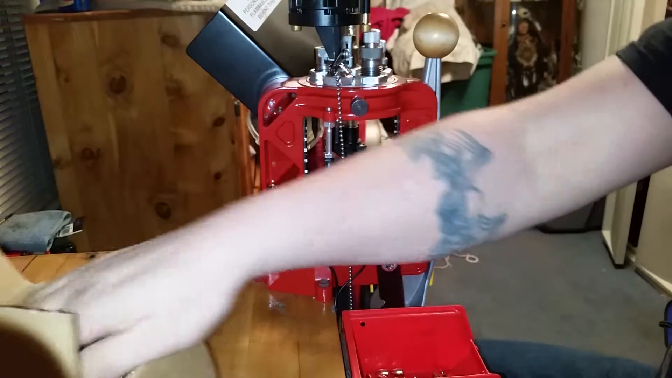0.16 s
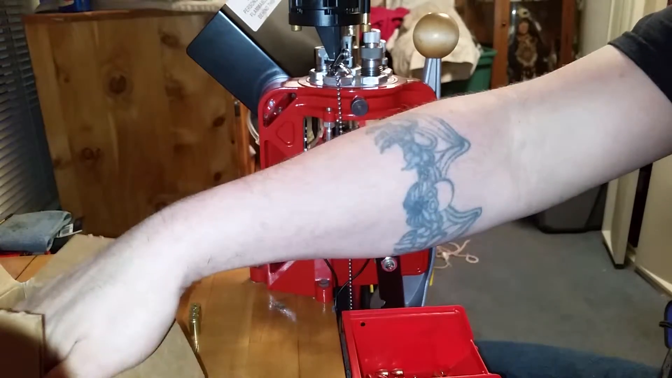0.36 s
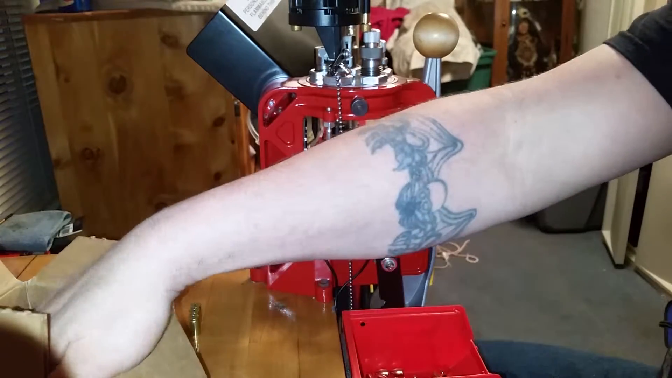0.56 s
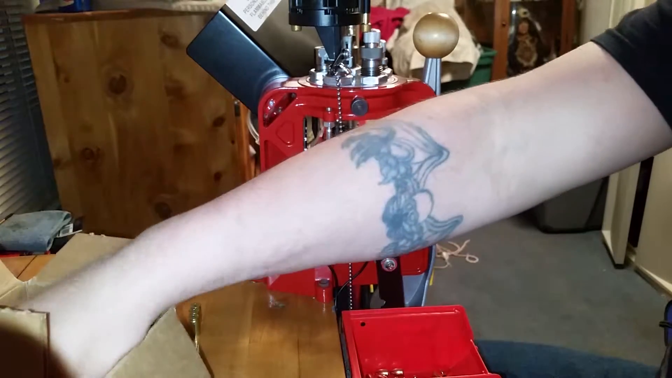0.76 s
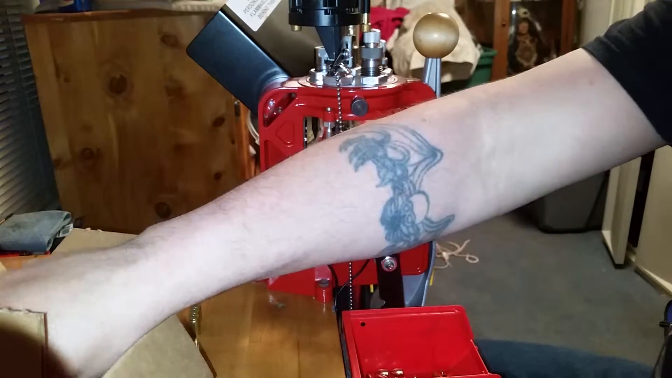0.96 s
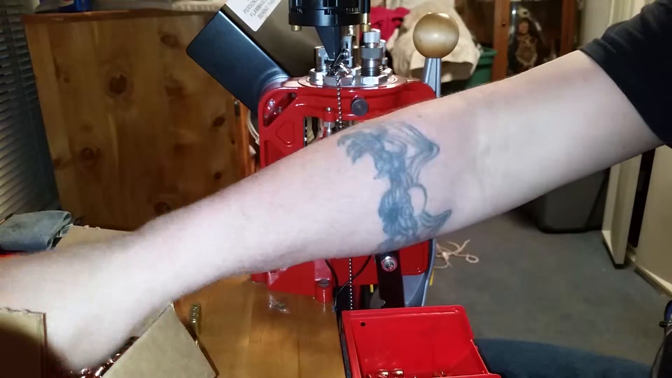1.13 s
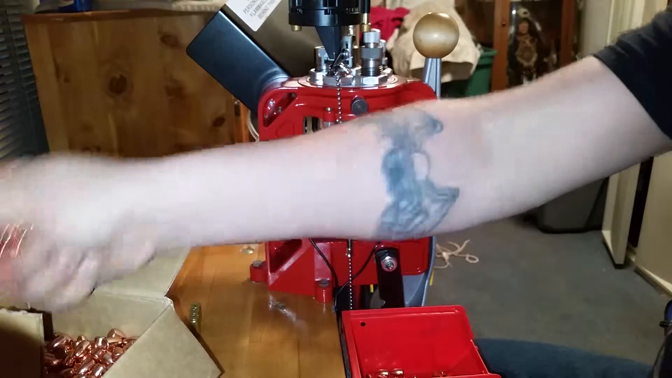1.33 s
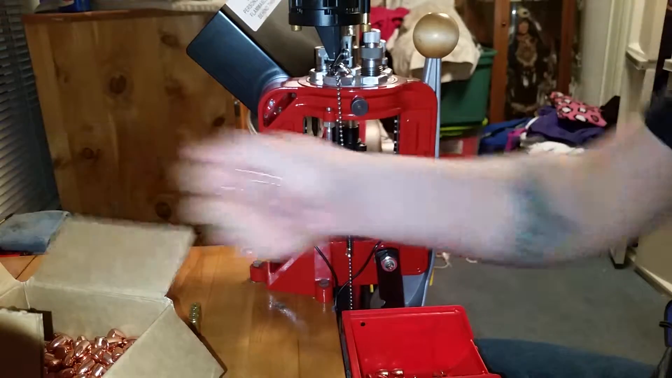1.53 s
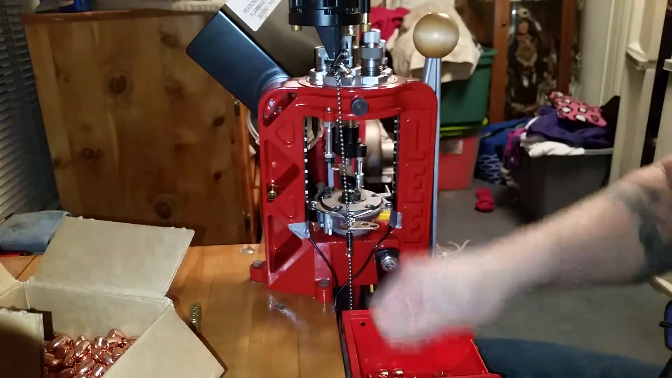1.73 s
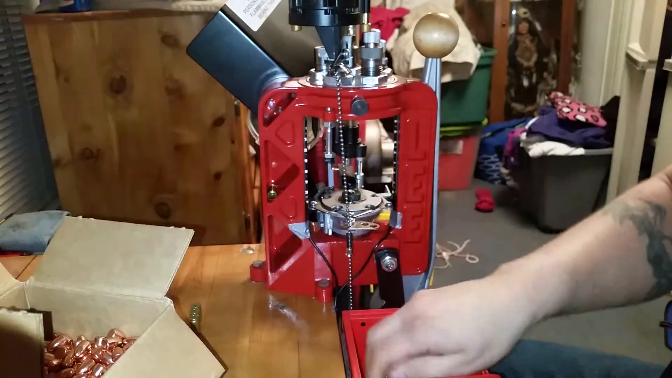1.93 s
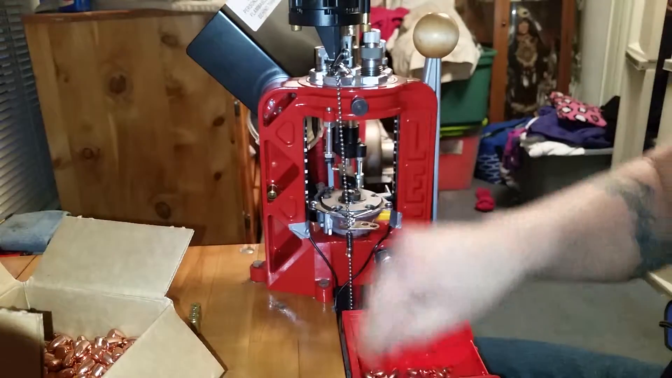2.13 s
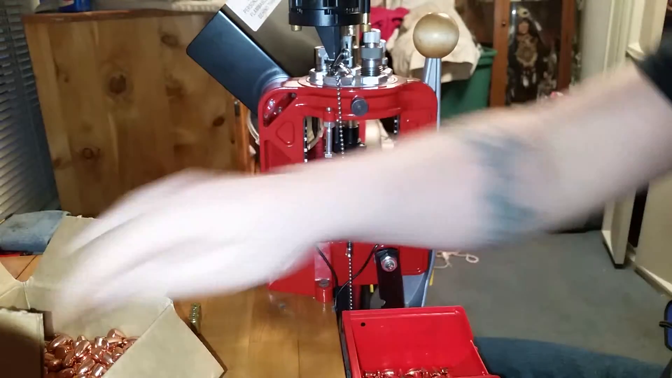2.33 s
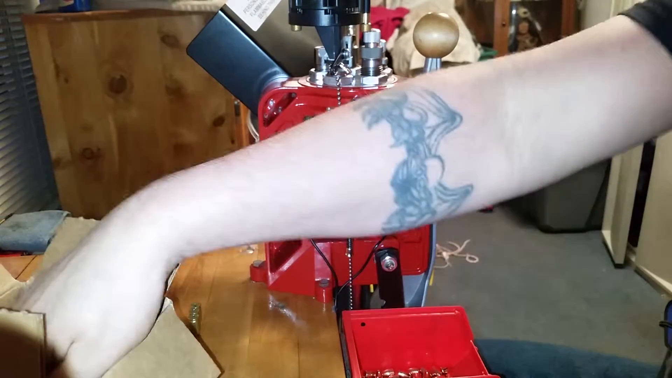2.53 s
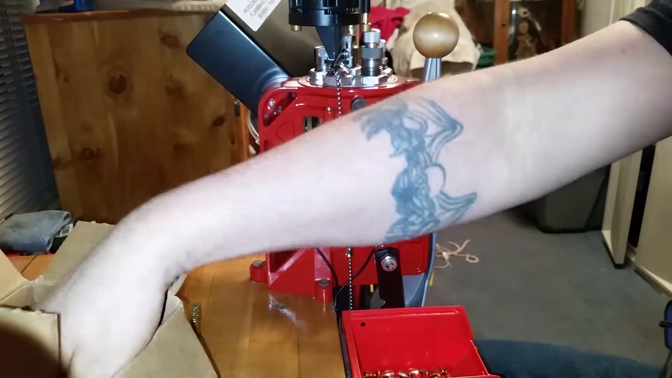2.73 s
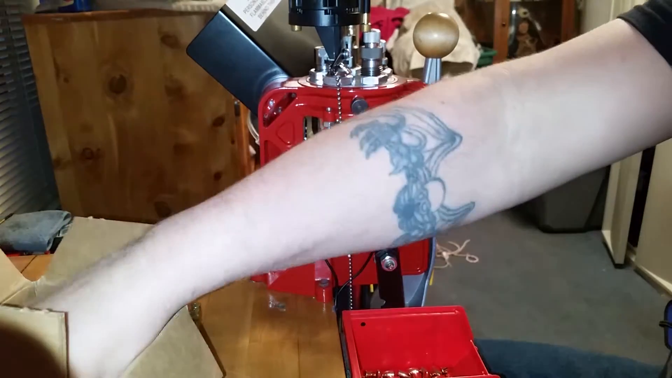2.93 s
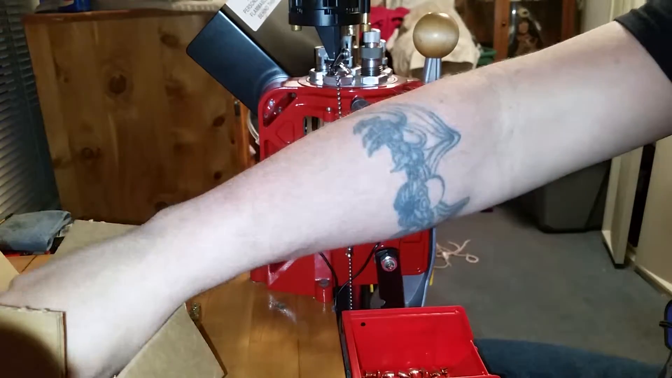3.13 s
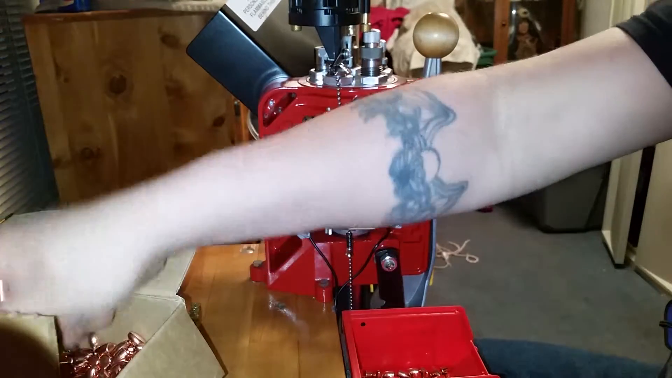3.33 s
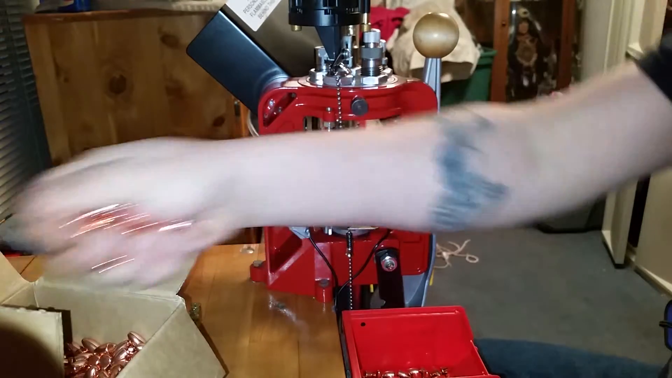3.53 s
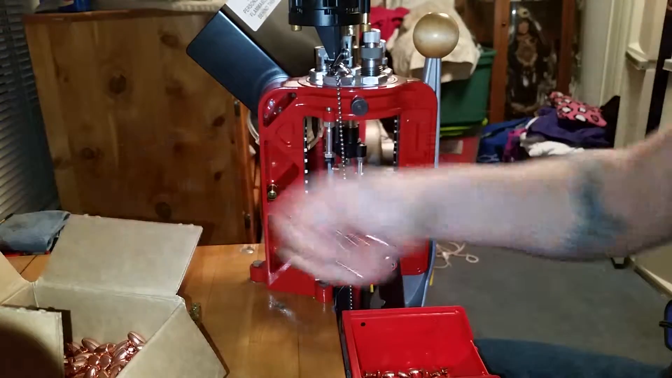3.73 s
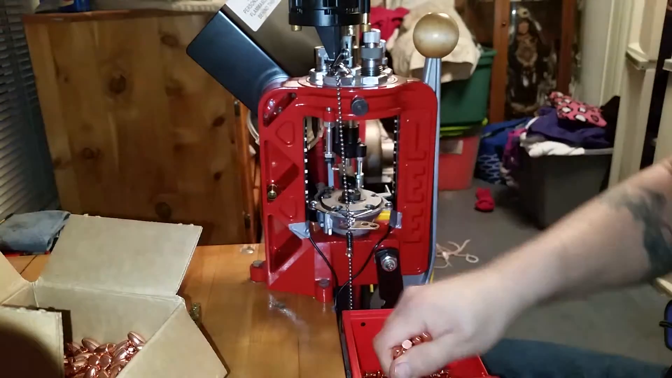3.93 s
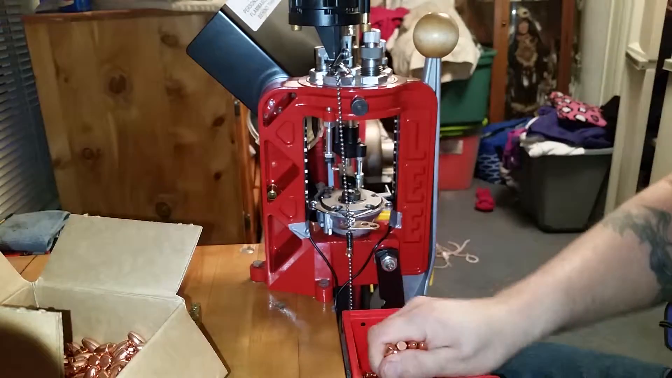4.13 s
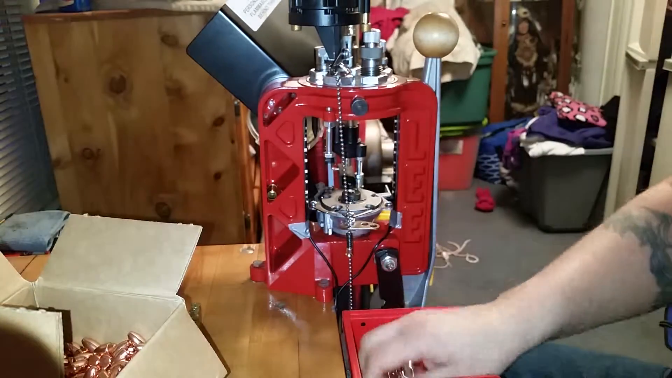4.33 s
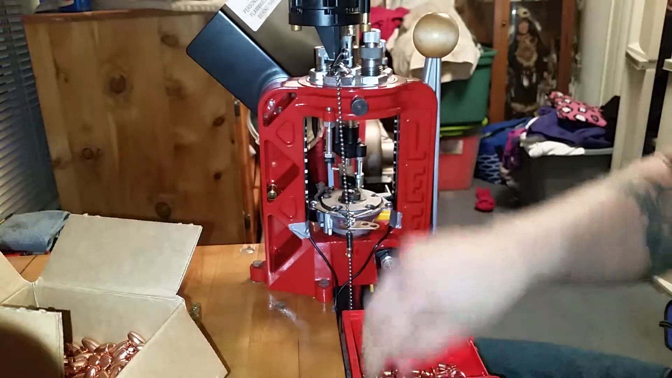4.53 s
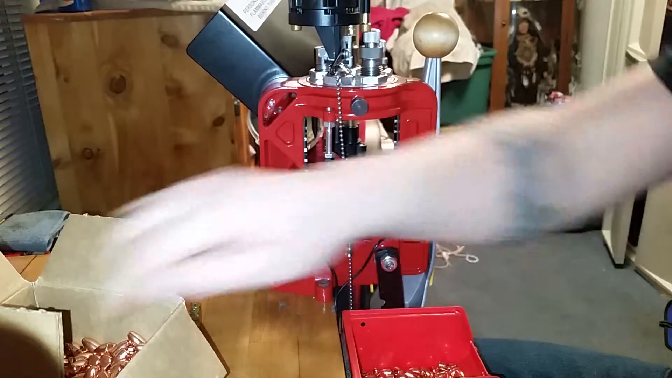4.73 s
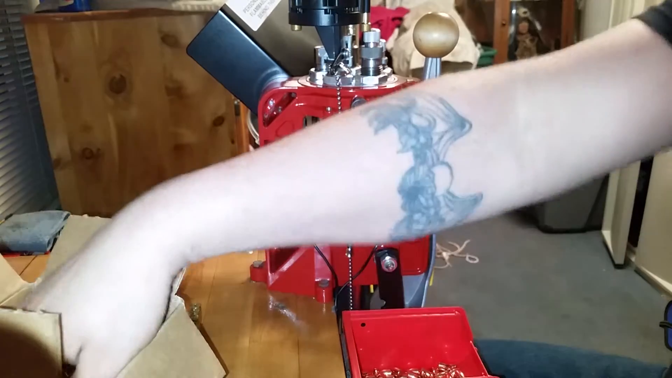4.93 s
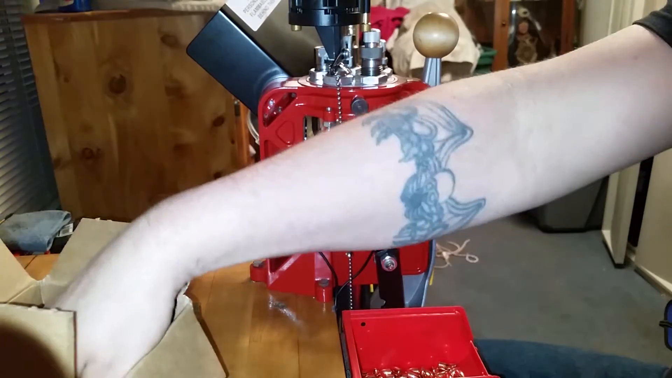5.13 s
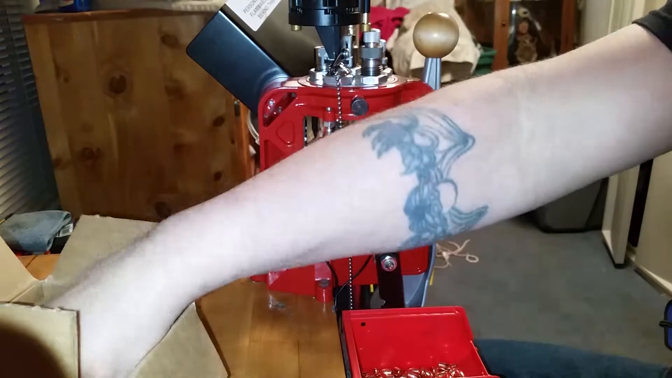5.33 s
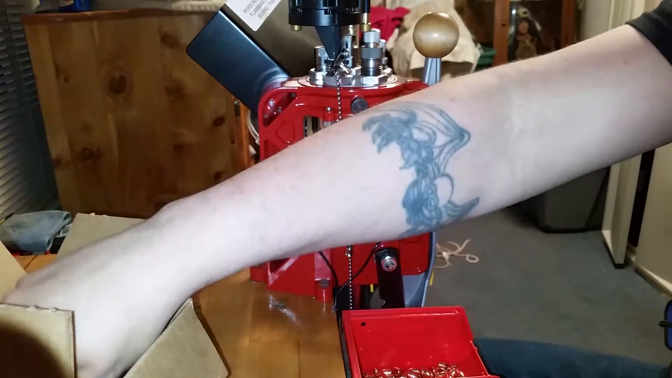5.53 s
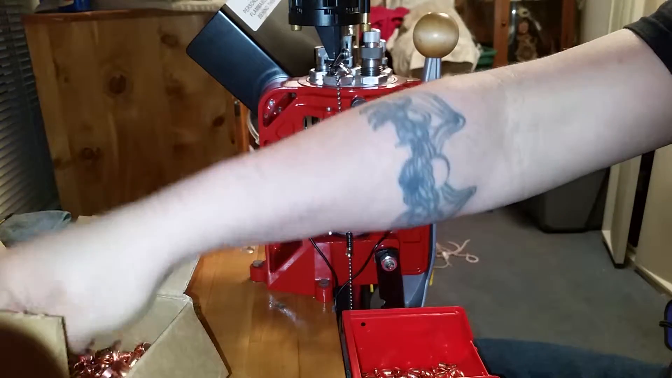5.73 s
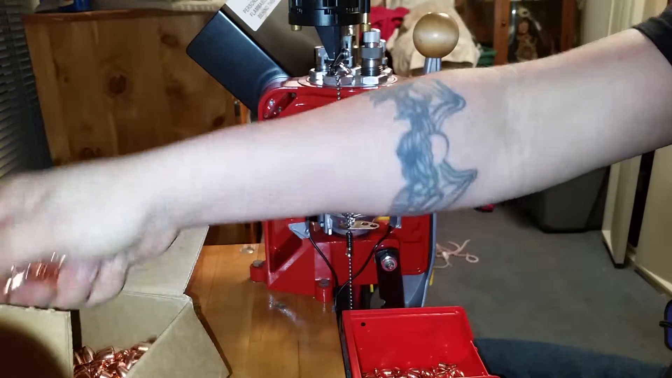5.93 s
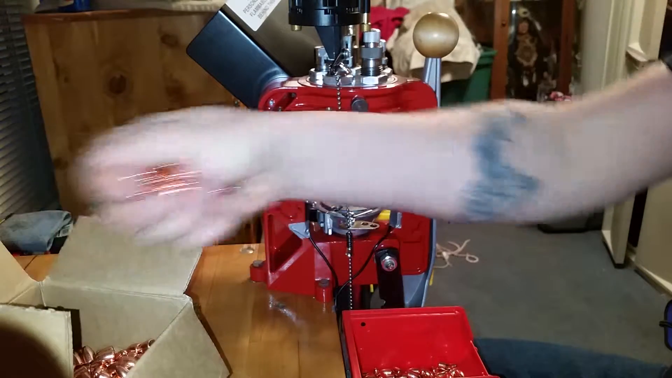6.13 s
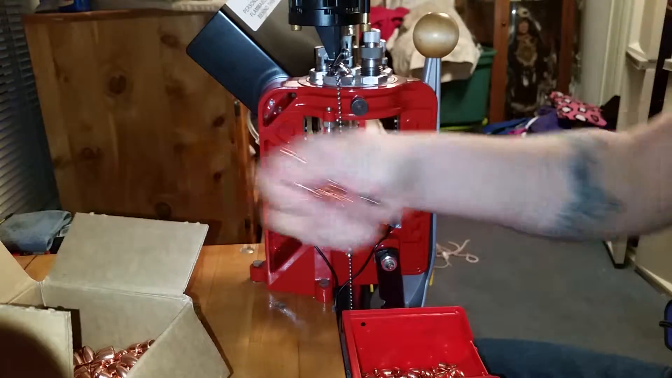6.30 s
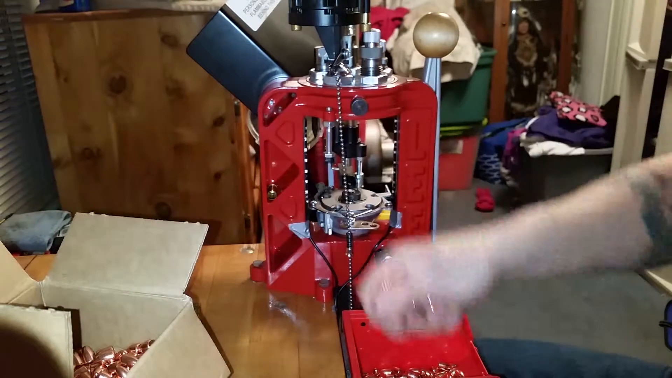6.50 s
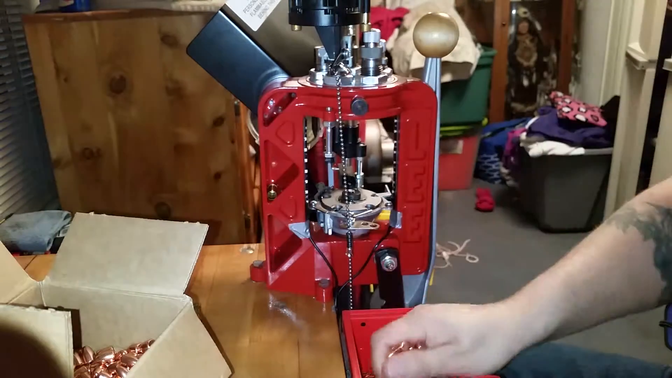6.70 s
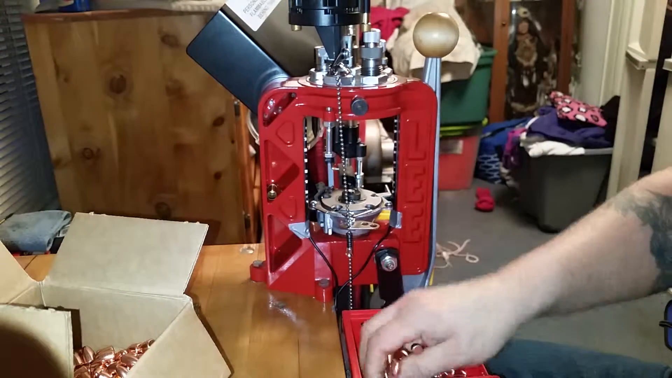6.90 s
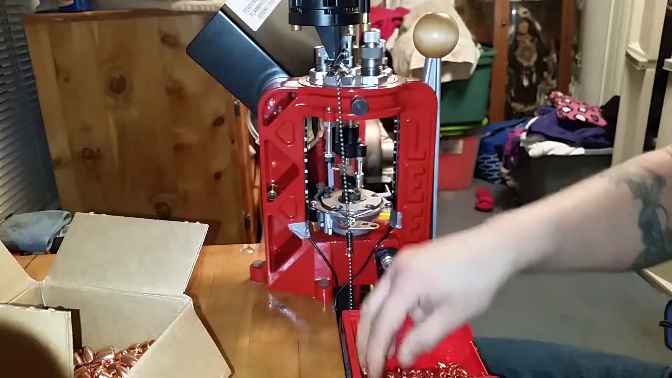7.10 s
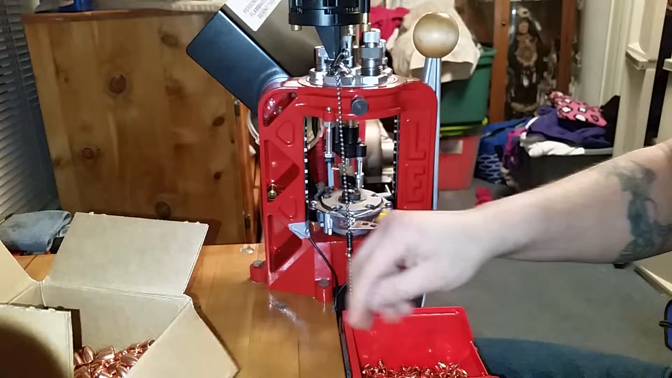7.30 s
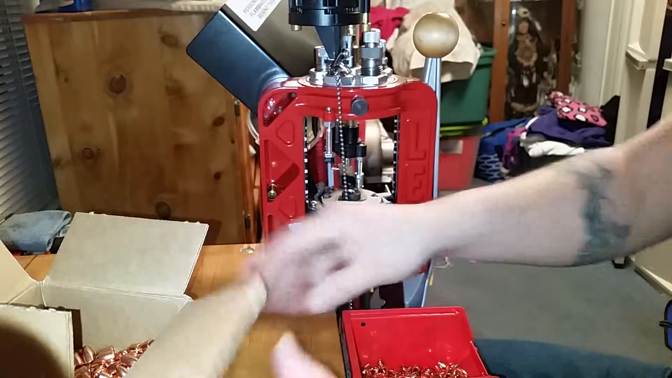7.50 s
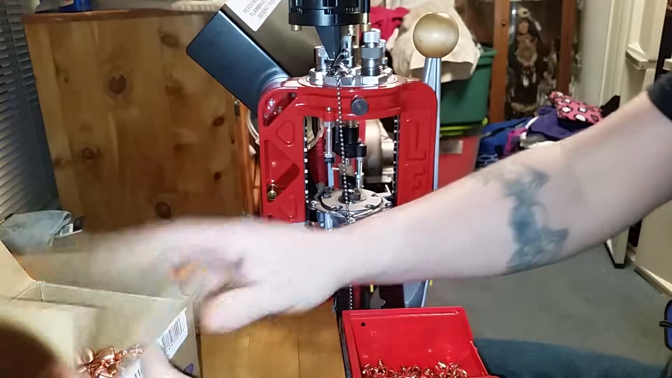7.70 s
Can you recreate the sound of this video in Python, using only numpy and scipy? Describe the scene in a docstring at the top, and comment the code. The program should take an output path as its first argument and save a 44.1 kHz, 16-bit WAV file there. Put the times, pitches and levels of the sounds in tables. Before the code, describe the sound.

A hand rakes through small metal bullets in a cardboard box, then pours clattering handfuls into a plastic tray, three times over, in a small room.

```python
"""A sleeve rustles over a low drone and faint hiss; a hand digs into a cardboard box of small copper bullets.
It carries a fistful across a bench and pours it into a plastic tray, three times; at the end the hand
shifts the box, which knocks and rattles briefly. Two microphone ports hear it all in a small room.
Random trains of contacts and timed knocks excite metal clicks and the ringing modes of box or tray.
The sleeve is dense grains of coloured noise; drone, hiss, air and bench shudder are filtered noise."""
import sys
import numpy as np
from scipy import signal
from scipy.fft import rfft, irfft, next_fast_len
from scipy.io import wavfile
from scipy.ndimage import uniform_filter1d

SR = 44100
rng = np.random.default_rng(int(sys.argv[2]) if len(sys.argv) > 2 else 0)


def inscribe(sig):
    """Save sig as 16-bit PCM at rate SR to the path in sys.argv[1].

    A 1-D sig is mono; a 2-D sig holds one channel per row.
    Samples are clipped to [-1, 1] before scaling.
    """
    pcm = np.round(np.clip(np.atleast_2d(sig).T, -1, 1) * 32767)
    wavfile.write(sys.argv[1], SR, pcm.astype(np.int16))


def ratio(d):
    """dB to gain"""
    e = np.asarray(d, float) / 20
    return 10 ** e


N = 346520
PLACES = 8  # spots struck, each with its own answer
TAPS = 16384  # length of an answer

# room air colour: hz, density_db
ROOM_AIR = [(25, -17.5), (63, -15), (100, -1.5), (190, -12.5), (360, -12.5), (450, -22.5), (1000, -30),
            (2500, -36.5), (6000, -48), (16000, -47.5)]
# low drones: centre_hz, width_hz, level_db
DRONES = [(69, 5.7, -56), (142, 14, -51)]
AIR_DB, HISS_HZ, HISS_DB = -53.5, 4220, -54.5
ROOM_T60_S, ROOM_DB = 0.21, -8.5

# jolts of the bench: time_s, peak_gain_db
JOLTS = [(0.04, -44), (0.2, -45), (0.701, -50), (2.21, -46), (3.46, -50), (3.74, -52), (4.07, -44.5),
         (4.421, -47.5), (4.66, -49.5), (4.97, -42.5), (5.49, -44.5), (6.91, -49.5), (7.399, -42),
         (7.7, -45), (7.84, -40.5)]
JOLT_RISE_DB_PER_S, JOLT_FALL_DB_PER_S = 110.5, 83
REST_DB, LEAN_DB = -59.5, -24  # shudder at rest; shudder against the hand's effort

# arm swinging by: start_s, stop_s, full_gain_db, stop_gain_db
ARM_SWINGS = [(-0.05, 0.294, -29, -35.5), (1.49, 1.616, -37.5, -38), (3.562, 3.737, -42.5, -32.5),
              (6.119, 6.275, -48.5, -35)]
SWING_RISE_S, SWING_RISE_DB, SWING_FALL_DB_PER_S = 0.035, 31, 597
# cloth colour: hz, density_db
CLOTH_COLOUR = [(300, -1), (1000, -6), (3000, -5), (6000, -2), (9000, -2), (16000, -9.5)]

# hand's effort, one list per stretch: three digs raking the heap, then shifting the box: time_s, clicks_gain_db
HAND_EFFORT = [
    [(0.2, -46.5), (0.32, -33), (0.45, -33), (0.512, -21.5), (0.6, -22), (0.63, -28.5), (0.76, -24.5),
     (1.0, -30.5), (1.2, -37.5), (1.36, -45.5), (1.46, -65.5)],
    [(2.49, -58.5), (2.56, -34), (2.652, -37.5), (2.732, -28), (2.836, -32.5), (2.942, -27.5), (3.03, -31),
     (3.27, -34.5), (3.482, -44.5), (3.558, -64)],
    [(4.92, -64), (4.948, -30.5), (5.034, -35.5), (5.14, -24.5), (5.414, -24.5), (5.48, -26.5),
     (5.582, -26.5), (5.87, -40.5), (5.99, -51.5), (6.14, -61.5)],
    [(7.48, -57.5), (7.682, -62), (7.702, -43.5), (7.8, -65), (7.806, -43.5), (7.858, -44.5)],
]
# dull bumps on the cardboard: time_s, peak_db
THUMPS = [(0.266, -28), (0.425, -24.5), (0.519, -23), (0.6, -19.5), (0.895, -24), (1.008, -24),
          (2.525, -31.5), (2.564, -22.5), (3.221, -27), (3.265, -26), (3.487, -38), (4.944, -24.5),
          (5.446, -12.5), (5.786, -26.5), (5.975, -31), (7.699, -41.5), (7.81, -30.5)]
# boom modes of the box walls: hz, energy_db, t60_s
WALL_MODES = [(252, -12, 0.021), (287, -6, 0.042), (334.4, 0.5, 0.099)]
BOOM_DB, BOOM_WANDER_DB = -10.5, 3.5

# single knocks in the box, and dull bumps of wrist or full fist as the arm stops:
# time_s, click_peak_db, body_vs_click_db
BOX_KNOCKS = [(0.2589, -30, 5), (0.3277, -17, -16), (0.482, -12, -5), (0.5744, -10, -16),
              (0.7794, -16.5, 2), (1.2494, -39, 0), (1.3405, -33, -25), (1.61, -46, 13), (2.5223, -24, -1),
              (3.486, -22.5, -4), (3.5208, -31.5, -9), (3.725, -44, 13), (4.9407, -27, 2),
              (5.1111, -17, 0.5), (5.559, -20, 7.5), (5.5994, -23, 14.5), (5.7828, -16.5, 2.5),
              (5.8593, -21, 0), (5.8994, -30, 4), (5.954, -25.5, -1), (5.9633, -23.5, -11),
              (6.0594, -48, 0), (6.0752, -27.5, -1), (6.098, -29.5, -5), (6.1332, -33, -4),
              (6.1722, -25.5, 0), (6.353, -33, -4.5), (7.5242, -32, -3), (7.5435, -27, -22),
              (7.5744, -32, -4), (7.628, -37.5, -7), (7.702, -31, 4), (7.7572, -28.5, 0), (7.7857, -39, -2),
              (7.8077, -27, -20)]
# rattle modes of the box: hz, energy_db, t60_s
BOX_MODES = [(572.4, -4, 0.07), (644, 5.5, 0.02), (833, -4, 0.058), (982, -2.5, 0.026), (1132, -0.5, 0.023),
             (1282, 4.5, 0.022), (1378, 1.5, 0.022), (1548, 1.5, 0.035), (1760, -0.5, 0.025),
             (1925, -7, 0.073), (2228, -7, 0.075)]
# metal click colour in the box: hz, density_db
BOX_CLICK_COLOUR = [(300, -19.5), (1000, -2.5), (2000, -0.5), (4000, -1.5), (8500, -6), (11000, -11),
                    (13500, -18.5), (16000, -22.5)]
# rattle against clicks: grows as the fist closes, drops once it lifts clear
RATTLE_DB, CLOSING_DB_PER_S, RATTLE_WANDER_DB = -5, 7, 1.53
LIFT_AFTER_S, LIFTED_DB_PER_S = 0.89, 29

# handfuls running out: fist_opens_s, full_flow_s, empty_s, full_gain_db, end_gain_db
POURS = [(2.038, 2.07, 2.382, -16.5, -25.5), (4.314, 4.36, 4.59, -15.5, -15.5),
         (6.818, 6.956, 7.254, -13.5, -21)]
POUR_RISE_DB, RUN_OUT_DB_PER_S = 14.5, 168
# hand touching the tray, and bullets slipping from the fist and skittering:
# time_s, clicks_gain_db, fall_db_per_s, tray_vs_clicks_db
TOUCHES_AND_SLIPS = [(1.92, -34.5, 898.5, 7), (1.962, -22, 302.5, 4), (2.023, -32, 203, -3),
                     (2.41, -34, 154, -12), (4.026, -49, 112, 5), (4.04, -23, 336, -2.5),
                     (4.228, -23, 703, 2), (4.26, -30.5, 37, -7.5), (4.317, -28.5, 602, 8.5),
                     (4.79, -79, 80, -25), (6.76, -54, 30, -12.5), (7.423, -52, 300, -5),
                     (7.47, -57, 100, -12)]
TOUCH_RISE_S = 0.012
# single knocks in the tray: time_s, click_peak_db, body_vs_click_db
TRAY_KNOCKS = [(1.9195, -30, 2.5), (1.9585, -13.5, -0.5), (1.9664, -6.5, -6), (1.9764, -18, 4),
               (1.9844, -22, -1), (1.9994, -30, -10), (2.0232, -3, -2), (2.0476, -6, -8), (2.0544, -9, -6),
               (2.1044, -15, 10), (2.3331, -11, -6), (2.4084, -8.5, -22), (2.4269, -18.5, -20),
               (2.4568, -16, -20), (4.0395, -24, 4), (4.1819, -14.5, 6.5), (4.1976, -30.5, -21),
               (4.2233, -6.5, 1.5), (4.2498, -16.5, -7), (4.2867, -17, -15), (4.3024, -15, 3),
               (4.3156, -11.5, -4), (4.335, -10.5, -6), (4.5007, -12.5, 3), (4.7222, -16, -18),
               (4.7834, -30, -22), (4.817, -28, -21), (4.8524, -40, -18), (6.7967, -33.5, -21),
               (6.8142, -22, 5), (6.8319, -21, 1), (6.8442, -11, -2.5), (6.8744, -11.5, 1.5),
               (6.8894, -11, 0), (6.9744, -9, -19), (7.1694, -12, -6), (7.2444, -12.5, -8.5),
               (7.419, -24, -13), (7.4694, -32.5, -9)]
# ringing modes of the tray: hz, energy_db, t60_s
TRAY_MODES = [(302, -12, 0.066), (523, -9, 0.2), (645, -5.5, 0.05), (698, -9.5, 0.13), (741.7, 0, 0.037),
              (791.5, -8, 0.12), (851, 4, 0.038), (921, -5.5, 0.21), (1273, -7.5, 0.022),
              (1754, -11.5, 0.032), (2730, -19.5, 0.04)]
# metal click colour in the tray: hz, density_db
TRAY_CLICK_COLOUR = [(300, -34), (1000, 0.5), (2000, 1), (4500, 1.5), (8500, -3), (11000, -11.5),
                     (13500, -14.5), (16000, -21.5)]
# tray ring against clicks: drops as bullets cover the floor, and with each handful already there
BARE_DB, COVER_DB_PER_S, COVERED_DB, HANDFUL_DB = 3, 33, -3, -3

# left port response added to the left channel: hz, gain_db
LEFT_PORT = [(1000, -1.5), (2200, -3.5), (4000, -12.5), (6500, -19), (8300, -4.5), (10000, 6), (12000, 4.5),
             (16000, 2.5)]


def conv(x, h):
    """Convolution along time, cut to the length of x."""
    size = next_fast_len(x.shape[-1] + h.shape[-1])
    return irfft(rfft(x, size) * rfft(h, size), size)[..., :x.shape[-1]]


def shape(x, points):
    """Colours x by (Hz, dB) points with a causal minimum-phase response."""
    size = 2048
    hz, db = np.transpose(points)
    bin_hz = np.arange(size // 2 + 1) * SR / size
    log_gain = np.interp(np.log(bin_hz + 1), np.log(hz), db) * np.log(10) / 20
    cepstrum = irfft(log_gain)
    cepstrum[1:size // 2] *= 2
    cepstrum[size // 2 + 1:] = 0
    return conv(x, irfft(np.exp(rfft(cepstrum))))


def unit(x):
    """Scales to energy 1, averaged over channels."""
    return x / np.sqrt(np.sum(x ** 2) / len(np.atleast_2d(x)))


def walk(rate_hz):
    """Random levels held 1 / rate_hz s and slewed twice; spread 1."""
    k = int(SR / rate_hz)
    held = np.repeat(rng.standard_normal(N // k + 1), k)
    steps = uniform_filter1d(uniform_filter1d(held, k), k)[:N]
    return steps / steps.std()


def pair(size, alike_hz):
    """Two noises, the same in the bass and unrelated in the treble."""
    low = signal.butter(2, alike_hz, fs=SR, output="sos")
    high = signal.butter(2, alike_hz, "high", fs=SR, output="sos")
    noise = rng.standard_normal((3, size))
    return signal.sosfilt(low, noise[0]) + signal.sosfilt(high, noise[1:])


def band(x, hz, width_hz):
    """Band-passes noise and scales it to rms 1."""
    edges_hz = [hz - width_hz / 2, hz + width_hz / 2]
    sos = signal.butter(2, edges_hz, "band", fs=SR, output="sos")
    return np.sqrt(N) * unit(signal.sosfilt(sos, x))


def fade(t60_s):
    """Exponential decay."""
    return np.exp(-np.log(1000) * np.arange(TAPS) / SR / t60_s)


def swell(start, full, stop, full_db, stop_db, rise_db, fall_db_per_s):
    """Gain that climbs rise_db from start to full, drifts on to stop and then dies away."""
    t = np.arange(N) / SR
    db = np.interp(t, [start, full, stop], [full_db - rise_db, full_db, stop_db])
    db = db - fall_db_per_s * np.maximum(t - stop, 0)
    return (t >= start) * ratio(db)


def since(starts):
    """Seconds since the latest of the given moments, 0 before the first."""
    t, starts = np.arange(N) / SR, np.array(starts)
    latest = np.maximum(np.searchsorted(starts, t) - 1, 0)
    return np.maximum(t - starts[latest], 0)


def room(direct):
    """Adds the walls' diffuse answer, which swells in over 0.8 ms and loses treble."""
    onset = np.minimum(np.arange(TAPS) / SR / 0.0008, 1)
    tail = unit(pair(TAPS, 750) * fade(ROOM_T60_S) * onset)
    return direct + ratio(ROOM_DB) * conv(shape(tail, [(2000, 2.0), (16000, -7)]), direct)


def click(colour, t60_s, left_db):
    """One contact: a sharp tick smeared by the neighbours it jostles."""
    decay = 0.57 * fade(0.0078) + fade(t60_s)
    sound = unit(shape(pair(TAPS, 640) * decay, colour))
    return room(sound * ratio([[left_db], [0]]))


def ring(modes, spread_rad_per_khz, low_hz):
    """A blow at one spot: modes start together with random shares; port phases part in the treble."""
    t, out = np.arange(TAPS) / SR, 0
    for hz, db, t60_s in modes:
        share, detune, phase = rng.standard_normal(3)
        lead_rad = np.array([[phase * spread_rad_per_khz * hz / 1000], [0]])
        wave = np.sin(2 * np.pi * hz * (1 + 0.013 * detune) * t + lead_rad)
        out = out + ratio(db + 2 * share) / np.sqrt(t60_s) * wave * fade(t60_s)
    swing_up = 1 - np.exp(-t / 0.003)
    bullet_damping = 0.54 + np.exp(-t / 0.008)  # early loss while the bullet still lies on the wall
    # the ring is cut away below low_hz
    high = signal.butter(3, low_hz, "high", fs=SR, output="sos")
    return room(unit(signal.sosfilt(high, out * swing_up * bullet_damping)))


def contacts(rate_hz, scatter_db, patchy_db):
    """Random contacts of unequal but bounded size, in clumps, dealt over the spots; mean power 1."""
    hit = rng.random((PLACES, N)) < rate_hz / PLACES / SR
    size = np.minimum(rng.exponential(size=hit.shape), 3)
    sign = rng.choice([-1, 1], hit.shape)
    train = hit * ratio(scatter_db * size + patchy_db * walk(70)) * sign
    return train / np.sqrt(np.mean(train.sum(0) ** 2))


def strike(stream, times_s, peak_db, answers):
    """Each spot answers its share of the stream and of single blows, which reach the given peaks."""
    force, size = stream.copy(), next_fast_len(N + TAPS)
    for k, (s, db) in enumerate(zip(times_s, peak_db)):
        spot = k % PLACES
        force[spot, int(s * SR)] += ratio(db) / np.abs(answers[spot].mean(0)).max()
    spectrum = sum(rfft(f, size) * rfft(a, size) for f, a in zip(force, answers))
    return irfft(spectrum, size)[:, :N]


def hand_effort_db():
    """Hand's effort over time, -120 dB between stretches."""
    t, out = np.arange(N) / SR, np.full(N, -120.)
    for rows in HAND_EFFORT:
        time_s, db = np.transpose(rows)
        inside = (t >= time_s[0]) & (t <= time_s[-1])
        out[inside] = np.interp(t[inside], time_s, db)
    return out


def shaking_db():
    """Bench shudder level: rest, the hand's effort and jolts that rise and fall linearly in dB."""
    t = np.arange(N) / SR
    level = ratio(REST_DB) + ratio(LEAN_DB + hand_effort_db())
    for s, db in JOLTS:
        drop_db = np.where(t < s, JOLT_RISE_DB_PER_S * (s - t), JOLT_FALL_DB_PER_S * (t - s))
        level = level + ratio(db - drop_db)
    return 20 * np.log10(level)


def background():
    """Room air, two wavering drones, a narrow hiss mostly at the right port and bench shudder."""
    air = ratio(AIR_DB) * np.sqrt(N) * unit(shape(pair(N, 350), ROOM_AIR))
    shake_db = shaking_db()
    # drones come up through the bench and swell a little when it is pressed
    press_db = 0.2 * (shake_db - shake_db.mean())
    drone = 0
    for hz, width_hz, db in DRONES:
        level = ratio(db + 3.34 * walk(7.2) + press_db)
        drone = drone + level * band(rng.standard_normal(N), hz, width_hz)
    hiss = ratio(HISS_DB + np.array([[-16], [0]])) * band(rng.standard_normal((2, N)), HISS_HZ, 1100)
    shudder = ratio(shake_db + np.array([[-4], [0.5]])) * band(pair(N, 55), 77, 130)
    return air + drone + hiss + shudder


def sleeve():
    """Cloth and skin rubbing: very dense fine grains."""
    gain = sum(swell(start, start + SWING_RISE_S, stop, full_db, stop_db, SWING_RISE_DB, SWING_FALL_DB_PER_S)
               for start, stop, full_db, stop_db in ARM_SWINGS)
    grains = contacts(4300, 1.2, 2.0) * gain
    return strike(grains, [], [], [click(CLOTH_COLOUR, 0.0038, 0.57) for _ in range(PLACES)])


def cardboard():
    """The heap shifting and knuckles bumping make the box walls boom fitfully."""
    gain = ratio(hand_effort_db() + BOOM_DB + BOOM_WANDER_DB * walk(12))
    push = contacts(500, 2.9, 1.7) * gain
    return strike(push, *np.transpose(THUMPS), [ring(WALL_MODES, 0.33, 170) for _ in range(PLACES)])


def bullets(gains, knocks, modes, colour, scatter_db, patchy_db, left_db, low_hz):
    """A stream of contacts plus single knocks: all click, the knocks and fewer contacts also ring the vessel."""
    (click_gain, body_gain), (time_s, peak_db, body_db) = gains, np.transpose(knocks)
    rate_hz = 2200
    blow = contacts(rate_hz / 6, scatter_db, patchy_db)
    tick = (0.5 * blow + 0.92 * contacts(rate_hz, scatter_db, patchy_db)) * click_gain
    clicks = [click(colour, 0.037, left_db) for _ in range(PLACES)]
    rings = [ring(modes, 0.74, low_hz) for _ in range(PLACES)]
    metal = strike(tick, time_s, peak_db, clicks)
    return metal + strike(blow * body_gain, time_s, peak_db + body_db, rings)


def handling_box():
    """Gains of the clicks and of the box's rattle from the hand's effort."""
    effort, t = ratio(hand_effort_db()), since([rows[0][0] for rows in HAND_EFFORT])
    rattle_db = RATTLE_DB + CLOSING_DB_PER_S * t - LIFTED_DB_PER_S * np.maximum(t - LIFT_AFTER_S, 0)
    return effort, effort * ratio(rattle_db + RATTLE_WANDER_DB * walk(15))


def pouring():
    """Gains of the clicks and of the tray's ring from pours, touches and slips."""
    flows = [swell(*row, POUR_RISE_DB, RUN_OUT_DB_PER_S) for row in POURS]
    bare_db = np.maximum(BARE_DB - COVER_DB_PER_S * since([row[0] for row in POURS]), COVERED_DB)
    floor = ratio(bare_db) * sum(g * ratio(k * HANDFUL_DB) for k, g in enumerate(flows))
    touches = [swell(s - TOUCH_RISE_S, s, s, db, db, 27, fall) for s, db, fall, _ in TOUCHES_AND_SLIPS]
    touch_ring = sum(g * ratio(row[3]) for g, row in zip(touches, TOUCHES_AND_SLIPS))
    return sum(flows + touches), floor + touch_ring


def scene():
    """Background, sleeve, box and tray."""
    box = bullets(handling_box(), BOX_KNOCKS, BOX_MODES, BOX_CLICK_COLOUR,
                  scatter_db=0.5, patchy_db=0.5, left_db=4.5, low_hz=415)
    tray = bullets(pouring(), TRAY_KNOCKS, TRAY_MODES, TRAY_CLICK_COLOUR,
                   scatter_db=3.0, patchy_db=1.5, left_db=1.0, low_hz=284)
    return background() + sleeve() + cardboard() + box + tray


def roll_off(x):
    """The treble ends steeply here."""
    return signal.sosfilt(signal.butter(12, 16810, fs=SR, output="sos"), x)


def record(dry):
    """The left port colours its treble; loud peaks are rounded and the top is cut."""
    ports = np.array([shape(dry[0], LEFT_PORT), dry[1]])
    rounded = np.tanh(1.135 * ports) / 1.113
    top = signal.ellip(8, .2, 60, 15900, fs=SR, output="sos")
    mix = signal.sosfilt(top, rounded)
    return roll_off(mix)


dry = scene()
out = record(dry)
inscribe(out)
```